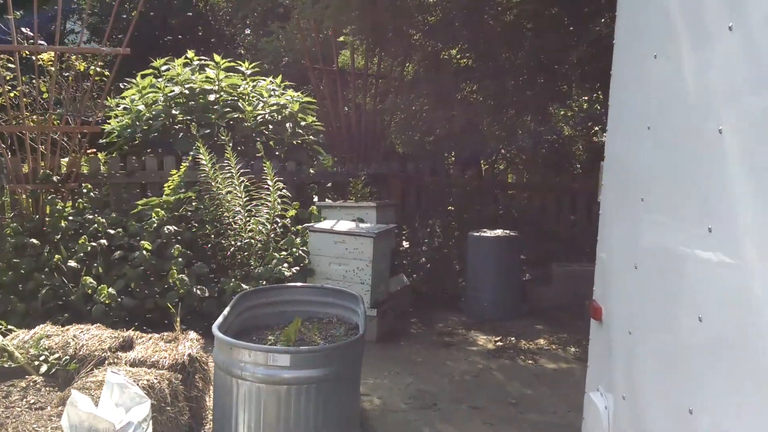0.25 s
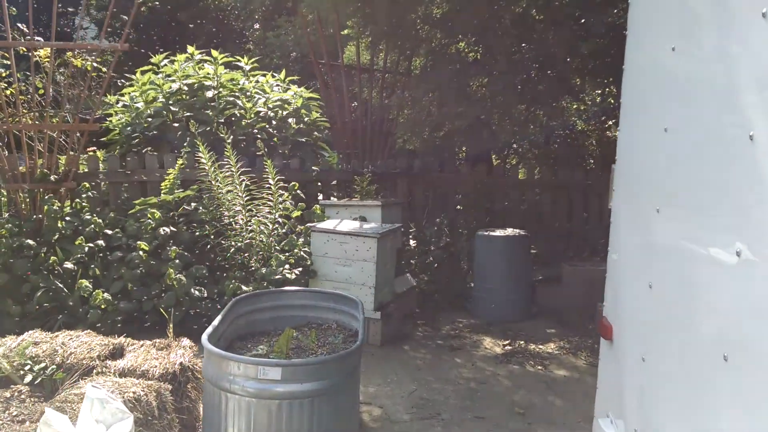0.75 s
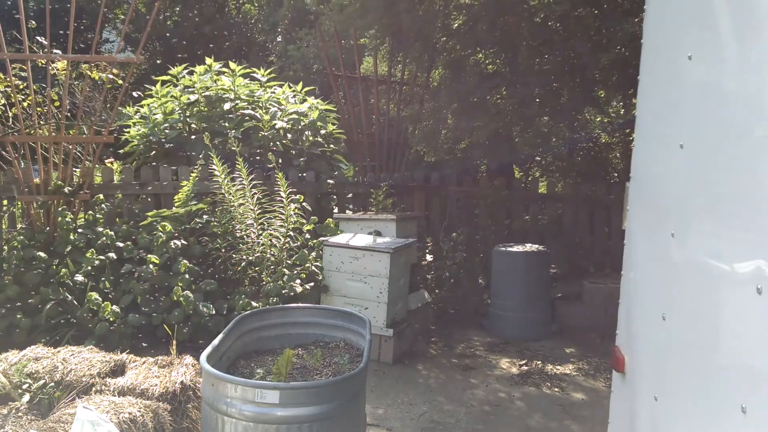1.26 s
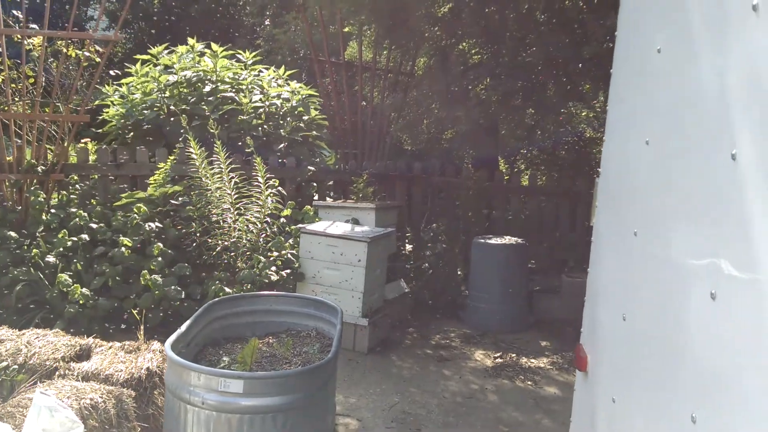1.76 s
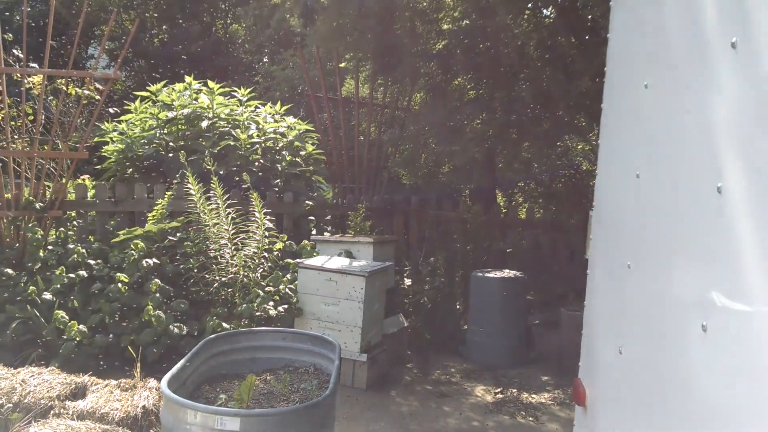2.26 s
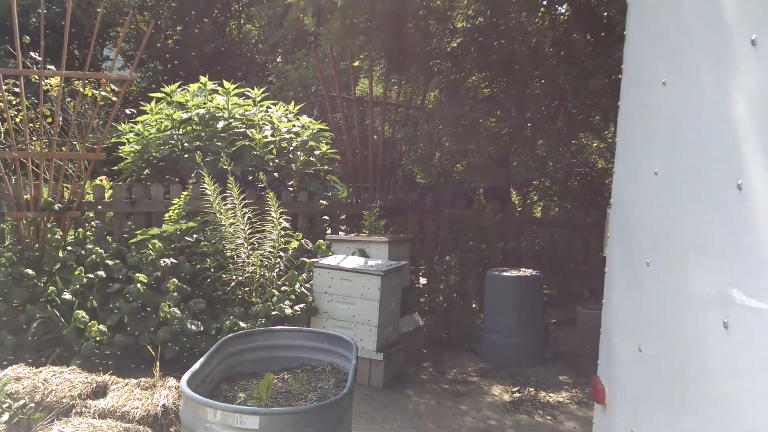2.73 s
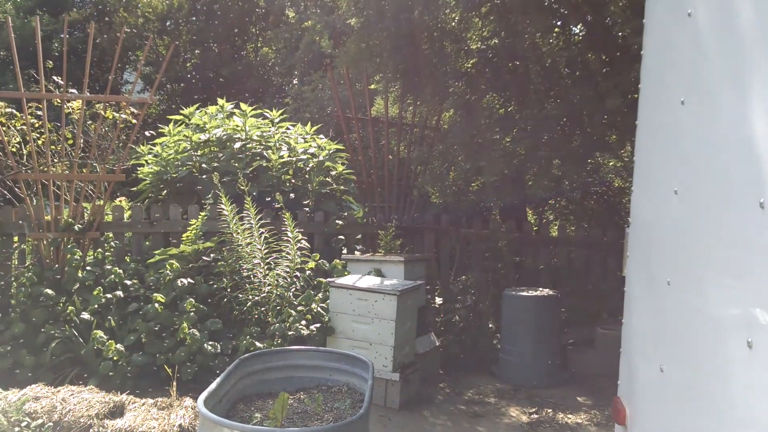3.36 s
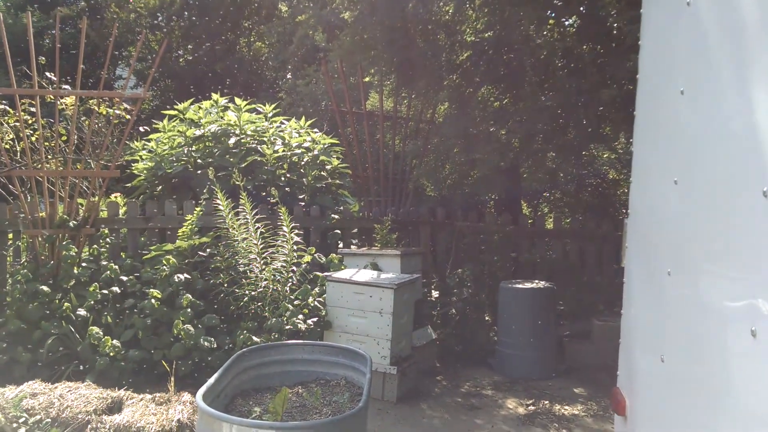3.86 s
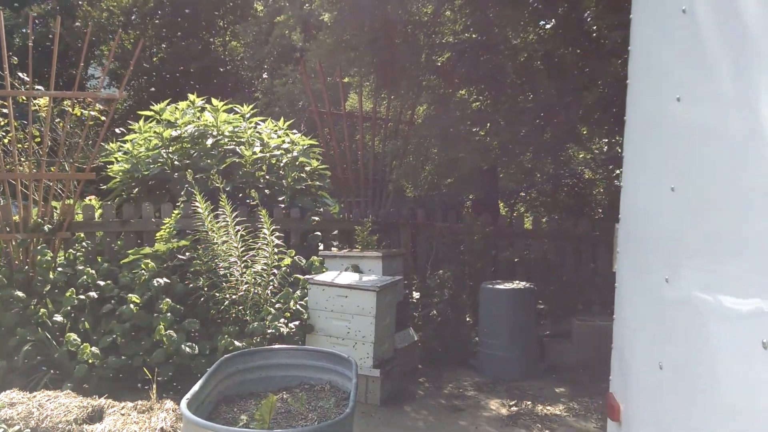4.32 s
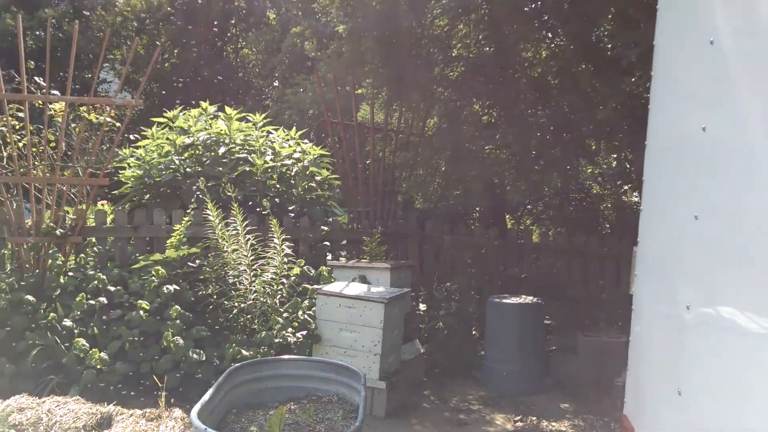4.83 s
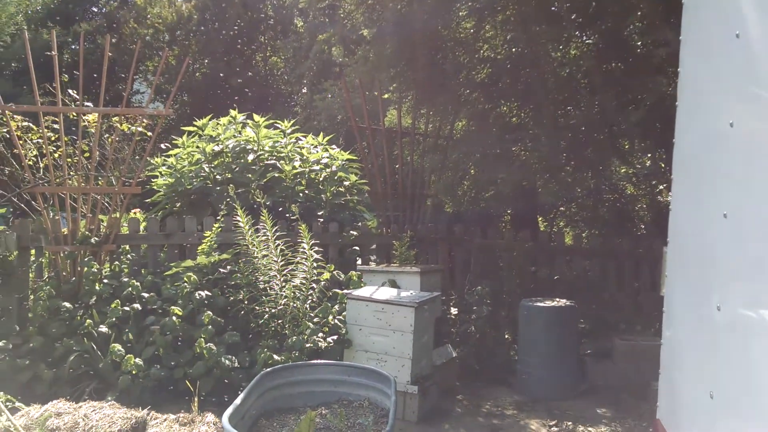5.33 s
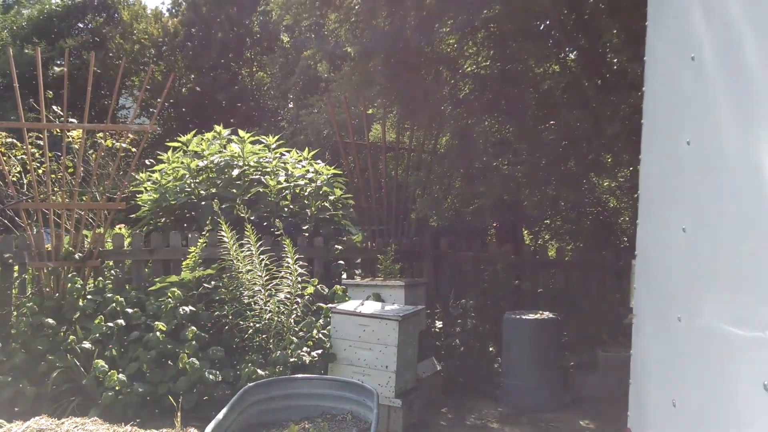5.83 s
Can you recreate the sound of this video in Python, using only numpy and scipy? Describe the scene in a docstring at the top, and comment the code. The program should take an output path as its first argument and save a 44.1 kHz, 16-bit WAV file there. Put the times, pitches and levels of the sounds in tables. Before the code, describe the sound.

Steady massed buzzing of bees outdoors, broken by low wind buffets and pops, with dull handling creaks, soft knocks and tiny ticks.

```python
"""Wind buffets and pops two microphone ports while a swarm of honey bees drones over a backyard hive.
Bees are stacks of wandering wing overtones; wind is lumpy low noise with a pulse for each pop.
Fingers creak (slip trains), knock (short dull rings), tick (case modes) and brush (noise bursts) on the case.
Behind lie a noise wash, a far-off hum and port hiss; the hand-held camera, a few metres from the hive,
steers each channel by taking away a delayed share of the other port."""
import sys
import numpy as np
from scipy import signal
from scipy.fft import rfft, irfft, next_fast_len
from scipy.io import wavfile
from scipy.ndimage import map_coordinates

SR = 44100
rng = np.random.default_rng(int(sys.argv[2]) if len(sys.argv) > 2 else 0)


def wrap_up_sound(samples):
    """Save the sound to the file named by the first command line argument, as 16-bit audio."""
    columns = np.atleast_2d(samples).T
    # keep every value between -1 and 1, then stretch to whole-number steps
    tamed = np.clip(columns, -1, 1)
    steps = np.round(tamed * 32767).astype(np.int16)
    wavfile.write(sys.argv[1], SR, steps)


N = 268569
TIME = np.arange(N) / SR  # s


def amp(db):
    """dB to gain."""
    return 10 ** (np.asarray(db) / 20)


def unit(x):
    """Scale to rms 1."""
    return x / np.sqrt(np.mean(x ** 2) + 1e-20)


def along(points, hz):
    """Interpolate (Hz, value) points on a log frequency axis."""
    point_hz, values = np.transpose(points)
    return np.interp(np.log(hz + 1), np.log(point_hz + 1), values)


def level_curve(points):
    """Gain over time from (time [s], level [dB]) points."""
    return amp(np.interp(TIME, *np.transpose(points)))


def wobble(knots_per_s, count, t=TIME):
    """Smooth random curves: splines through Gaussian knots."""
    knots = rng.standard_normal(count * (int(N / SR * knots_per_s) + 4))
    starts = np.arange(count)[:, None] * (len(knots) // count)
    return map_coordinates(knots, [starts + t * knots_per_s])


def filtered(x, response):
    """Multiply the spectrum of x by a complex response of frequency."""
    size = next_fast_len(N + 8192)
    spectrum = rfft(x, size) * response(np.fft.rfftfreq(size, 1 / SR))
    return irfft(spectrum, size)[..., :N]


def noise(density, channels):
    """Independent noises shaped to a (Hz, dB per Hz) density."""
    white = rng.standard_normal((channels, N))
    return filtered(white, lambda hz: amp(along(density, hz)) * np.sqrt(SR / 2))


def panned(x, left_right_db):
    """One sound at both ports, split by a level difference."""
    return x * amp([[left_right_db / 2], [-left_right_db / 2]])


# swarm loudness: (time [s], level [dB])
SWARM_LEVEL = [(0.0, -41.5), (0.41, -38.5), (1.42, -38.5), (1.81, -37.5), (1.98, -36.5), (2.17, -39),
               (3.15, -37.5), (3.61, -40), (4.95, -39.5), (5.33, -41), (6.09, -39.5)]
# wingbeat overtones: (multiple of wingbeat, relative level [dB])
WING_OVERTONES = [(1, -2), (2, 0), (3, -8), (4, -9.5), (5, -7), (6, -11.5), (7, -17.5), (8, -16.5),
                  (9, -22), (10, -17.5)]


def swarm(count=72, step=6):
    """Each bee stacks wing overtones, drifts in pitch, comes and goes, and wanders across the ports."""
    t = TIME[::step]

    def drift(knots_per_s):
        coarse = wobble(knots_per_s, count, t[::16])
        return np.repeat(coarse, 16, axis=1)[:, :len(t)]

    bee_hz = 232 + 16 * rng.standard_normal((count, 1))
    beat_hz = bee_hz + 11 * drift(2.5) + 5 * drift(18)
    turns = np.cumsum(beat_hz, axis=1) * step / SR
    nearness = amp(4 * drift(3.5) + 3 * drift(16))
    lead_s = 0.00017 * drift(0.809)  # half the delay between ports

    cycle, spread_db = np.arange(1024) / 1024, 2.5
    waves = 0
    for multiple, db in WING_OVERTONES:
        gain = amp(db + spread_db * rng.standard_normal((count, 1)))
        phase = multiple * cycle + rng.random((count, 1))
        waves = waves + gain * np.sin(2 * np.pi * phase)

    rows = np.arange(count)[:, None]
    ports = []
    for side in (1, -1):
        position = (turns + side * beat_hz * lead_s) % 1
        index = (position * len(cycle)).astype(int)
        ports.append(np.sum(nearness * waves[rows, index], axis=0))
    drone = unit(signal.resample_poly(ports, step, 1, axis=1)[:, :N])
    return panned(drone * level_curve(SWARM_LEVEL), left_right_db=-3.0)


# single bees hovering nearer: (start [s], length [s], mean wingbeat [Hz], gain [dB])
NEAR_BEES = [(4.044, 0.16, 205, -42), (4.787, 0.33, 212, -45.5), (5.53, 0.58, 207, -46)]
# their overtones: (multiple of wingbeat, relative level [dB])
NEAR_OVERTONES = [(1, 4), (2, -3.5), (3, -7.5)]


def near_bees():
    """A near bee swells in and out on a slightly wavering beat."""
    out = np.zeros(N)
    for start_s, length_s, beat_hz, db in NEAR_BEES:
        turns = np.cumsum(beat_hz + 5 * wobble(12, count=1)[0]) / SR
        progress = np.clip((TIME - start_s) / length_s, 0, 1)
        swell = np.sin(np.pi * progress) ** 0.2
        gain = amp(db + 1.76 * wobble(21.07, count=1)[0])
        tone = sum(amp(level) * np.sin(2 * np.pi * k * turns) for k, level in NEAR_OVERTONES)
        out += swell * gain * tone
    return panned(out, left_right_db=0.0)


# gust loudness at the ports: (time [s], level [dB])
GUST_LEVEL = [(0.0, -22), (0.12, -38), (0.24, -24), (.42, -32.5), (0.58, -24), (0.84, -49), (1.2, -44),
              (1.56, -32), (2, -25.5), (2.2, -27.5), (2.52, -42), (2.64, -31), (2.88, -61), (3.0, -30.5),
              (3.12, -33), (3.36, -23.5), (3.5, -28), (3.9, -28.5), (4.5, -53.5), (6.09, -46)]
# buffet colour: (frequency [Hz], relative density [dB per Hz])
BUFFET_COLOUR = [(10, -27), (30, 2.5), (65, 0), (120, -5.5), (250, -21.5), (500, -27), (1000, -70),
                 (2000, -120)]


def buffets():
    """Lumpy low-frequency turbulence, different at each port."""
    lumps = amp(6.2 * wobble(22, count=2) + 1.2 * wobble(45, count=1))
    return level_curve(GUST_LEVEL) * unit(lumps * noise(BUFFET_COLOUR, channels=2))


# wind pops: (centre [s], peak [dB], centre to zero crossing [ms], port [+1 left, -1 right])
WIND_POPS = [(0.007, -13, 6.6, -1), (0.046, 0.5, 3.7, -1), (.05, -7.5, 3.6, 1), (0.263, -7.5, 7.2, -1),
             (0.326, -10.5, 3.1, 1), (0.367, -3.5, 5.7, 1), (0.504, -7, 4.6, 1), (0.57, -15, 2.8, 1),
             (1.607, -8, 5.1, 1), (1.79, -9, 5.1, 1), (1.855, -9, 3.8, 1), (1.983, -13, 2.1, 1),
             (2.2135, -7, 2, 1), (2.431, -10, 4.8, 1), (3.423, -12, 6.2, 1), (3.528, -8, 4.3, 1),
             (3.697, -12, 2.5, 1), (3.749, -5, 14, -1), (3.875, -12, 4, 1), (3.955, -7, 4.7, 1)]


def wind_pops():
    """Single eddies each push one membrane, with suction on both sides of the push."""
    out = np.zeros((2, N))
    for centre_s, db, width_ms, port in WIND_POPS:
        u = 1000 * (TIME - centre_s) / width_ms
        out[int(port < 0)] += amp(db) * (1 - u * u) / (1 + u * u) ** 2
    return out


# case creaks under the grip: (start [s], rise [s], length [s], slip rate [1/s], unevenness [0-1],
# gain [dB], ring at start [Hz], ring at end [Hz], left-right [dB])
CASE_CREAKS = [(1.777, 0.017, 0.14, 114, 0.24, -20.5, 260, 222, 9),
               (2.005, 0.055, 0.13, 200, 0.29, -15, 330, 225, -4.5),
               (2.418, .003, 0.037, 374, 0.14, -20.5, 513, 474, -10),
               (2.966, .003, 0.0725, 166, 0.1, -11.5, 297, 245, -2.5),
               (3.678, .02, 0.1, 220, 0.16, -39, 260, 200, 0)]


def creaks():
    """Stick-slip: uneven trains of slips, each a dull thud that falls in pitch along the train."""
    out = np.zeros((2, N))
    t = TIME[:SR // 30]
    for start_s, rise_s, length_s, rate, uneven, db, first_hz, last_hz, pan_db in CASE_CREAKS:
        gaps_s = np.exp(uneven * rng.standard_normal(40)) / rate
        slips_s = np.cumsum(gaps_s) - gaps_s[0]
        scatter_db = 2.5 * rng.standard_normal(40)
        sizes = amp(scatter_db - 6 * slips_s / length_s) * (slips_s < length_s)
        sizes *= np.clip(slips_s / rise_s, .3, 1)  # the grip tightens first
        # duller as the skin spreads
        ring_hz = np.interp(slips_s / length_s, [0, 1], [first_hz, last_hz])[:, None]
        tone = sum(g * np.sin(2 * np.pi * k * ring_hz * t) for k, g in [(.55, 1.2), (1, .9), (1.6, 0.38)])
        decay = amp(-60 * ring_hz * t / 6)  # 60 dB in 6 cycles
        thuds = tone * decay * (1 - np.exp(-3 * ring_hz * t)) ** 2
        at = ((start_s + slips_s[:, None]) * SR).astype(int) + np.arange(len(t))
        train = np.bincount(at.ravel(), (sizes[:, None] * thuds).ravel(), N)[:N]
        out += panned(amp(db) * train, pan_db)
    return out


# soft knuckle knocks: (peak [s], peak [dB], ring [Hz], swell [ms], left-right [dB])
KNUCKLE_KNOCKS = [(2.0225, -17, 340, 3, -6), (2.115, -24, 165, 7, -3), (2.981, -27, 300, 4, -4),
                  (3.103, -24, 220, 7, -1)]


def knocks():
    """A few cycles of dull ring that swell fast and die at half the pace."""
    out = np.zeros((2, N))
    for peak_s, db, ring_hz, swell_ms, pan_db in KNUCKLE_KNOCKS:
        u = 1000 * (TIME - peak_s) / swell_ms
        swell = np.exp(-np.where(u < 0, u, u / 2) ** 2)
        ring = np.cos(2 * np.pi * ring_hz * (TIME - peak_s))
        out += panned(amp(db) * swell * ring, pan_db)
    return out


# ticks on the case: (start [s], gain [dB], treble tilt [dB per doubling of 1 + (Hz / 2600)^4],
# rise constant [ms], left-right [dB])
CASE_TICKS = [(.6592, 2, -60, .5, 2), (.6645, 5, -60, .5, 1), (3.117, -13.5, 0, .035, -9)]
# case modes: (frequency [Hz], level before tilt [dB], t60 [s])
CASE_MODES = [(850, -19, 0.0061), (1506, -5.5, 0.0053), (1855, -3, 0.0045), (3370, -14.5, 0.0089),
              (4200, -8.5, 0.0035), (5160, -4.5, 0.0022), (5860, -8, 0.0025), (7200, -12, 0.0024),
              (9100, -14, 0.0045), (12200, -18, 0.002)]


def ticks():
    """Each tick rings the damped case modes, with a faint noisy rattle of the same colour."""
    out = np.zeros((2, N))
    t = TIME[:SR // 20]
    for start_s, db, tilt_db, rise_ms, pan_db in CASE_TICKS:
        ring = np.zeros(len(t))
        for hz, level_db, t60_s in CASE_MODES:
            mode_db = level_db + tilt_db * np.log2(1 + (hz / 2600) ** 4)
            ring += amp(mode_db - 60 * t / t60_s) * np.sin(2 * np.pi * hz * t)
        ring *= (1 - np.exp(-1000 * t / rise_ms)) ** 2
        grains = signal.fftconvolve(rng.standard_normal(len(t)), ring)[:len(t)]
        rattle = amp(-30 - 60 * t / .08) * grains
        first = round(start_s * SR)
        out[:, first:first + len(t)] += panned(amp(db) * (ring + rattle), pan_db)
    return out


# fingers brushing: (centre [s], width at 1/e [s], level at centre [dB], centre [Hz], width [octaves])
FINGER_BRUSHES = [(0.217, 0.017, -48, 1890, 0.26), (1.163, 0.063, -49.5, 3500, 1.1),
                  (1.844, 0.11, -42, 200, 1.5), (2.058, 0.23, -35, 266, 0.33),
                  (2.425, 0.014, -35, 550, 0.52), (2.989, .04, -36, 488, 0.43),
                  (3.017, 0.076, -32, 176, 0.45), (3.285, 0.024, -42.5, 4400, 0.79),
                  (4.836, 0.023, -42, 2110, 0.42), (4.844, 0.026, -43.5, 11800, 0.3)]


def brushes():
    """Skin friction: short bell-shaped bursts of band noise, mostly alike at both ports."""
    out = np.zeros((2, N))
    for centre_s, length_s, db, centre_hz, octaves in FINGER_BRUSHES:
        colour = lambda hz: np.exp(-(np.log2((hz + 1) / centre_hz) / octaves) ** 2 / 2)
        grains = rng.standard_normal((2, N)) + 2.5 * rng.standard_normal(N)
        swell = np.exp(-(2 * (TIME - centre_s) / length_s) ** 2)
        out += amp(db) * swell * unit(filtered(grains, colour))
    return out


# distant bees, leaves and traffic blurred together: (frequency [Hz], density before wavering [dB per Hz])
YARD_DENSITY = [(20, -55), (50, -52), (120, -60), (300, -72.5), (600, -76.5), (1200, -79), (2000, -99.5),
                (3500, -100), (6000, -120)]


def yard():
    """A diffuse wash, mostly alike at both ports, with a wavering low hum."""
    common, left, right = noise(YARD_DENSITY, channels=3) * amp(0.44 * wobble(7, count=1))
    hum_hz = 96 + 3 * wobble(6, count=1)[0]
    hum_gain = amp(-37.0 + 1.5 * wobble(8, count=1)[0])
    hum = hum_gain * np.sin(2 * np.pi * np.cumsum(hum_hz) / SR)
    return common + hum + amp(-15.0) * np.array([left, right])


# port self-noise: (frequency [Hz], density before wavering [dB per Hz])
LEFT_HISS = [(100, -79), (1000, -81), (2500, -91.5), (6000, -86), (9000, -89.5), (12000, -94.5),
             (16000, -96)]
RIGHT_HISS = [(100, -98), (1000, -81), (2500, -86), (5300, -84.5), (7400, -82.5), (8900, -79), (11000, -80),
              (13000, -84), (16000, -86.5)]


def hiss():
    """Independent self-noise of each port, wavering slightly together."""
    ports = np.vstack([noise(LEFT_HISS, channels=1), noise(RIGHT_HISS, channels=1)])
    return ports * amp(0.47 * wobble(9.8, count=1) + 0.089 * wobble(0.1, count=1))


def scene():
    """Pressure at the two ports, with their self-noise."""
    bees = swarm() + near_bees()
    wind = buffets() + wind_pops()
    grip = creaks() + knocks() + ticks() + brushes()
    return bees + wind + grip + yard() + hiss()


# share of the other port taken away: (frequency [Hz], share before the 0.94 ceiling [ratio])
CROSS_SHARE = [(30, 0.9), (300, 0.42), (1300, 0.56), (2600, 1), (4000, 0.83), (5300, 0.65), (7000, 0.16),
               (9000, 0.18), (15000, 0.12)]
# its delay: (frequency [Hz], delay [ms])
CROSS_DELAY_MS = [(70, 0.16), (400, 0.41), (1000, 0.4), (5300, 0.376), (8000, 0.38), (11000, 0.365),
                  (15000, 0.37)]


def record(dry):
    """Each channel loses a delayed share of the other port; a low cut makes pops rebound; then a band limit."""
    cut_hz, damping, top_hz = 17, 1.4, 15510

    def cross(hz):
        delay_s = along(CROSS_DELAY_MS, hz) / 1000
        return np.clip(along(CROSS_SHARE, hz), 0, .94) * np.exp(-2j * np.pi * hz * delay_s)

    def band(hz):
        low_cut = -hz ** 2 / (cut_hz ** 2 - hz ** 2 + 1j * damping * cut_hz * hz)
        return low_cut * (hz < top_hz)

    steered = dry - filtered(dry[::-1], cross)
    return filtered(steered, band)


dry = scene()
out = record(dry)
wrap_up_sound(out)
```